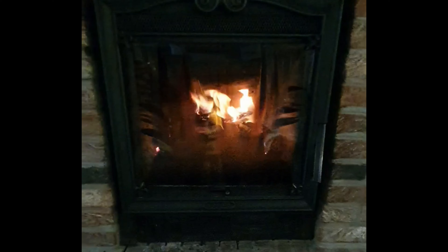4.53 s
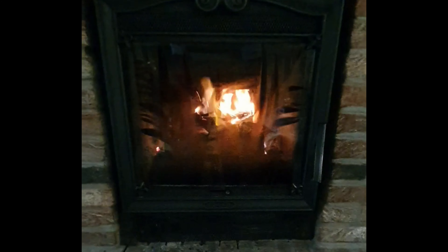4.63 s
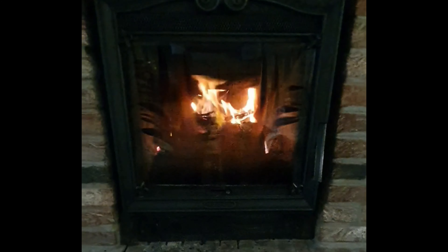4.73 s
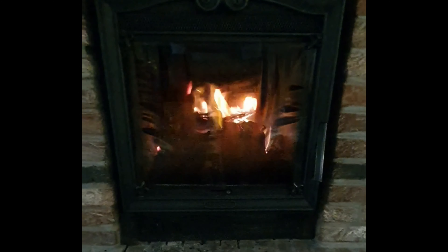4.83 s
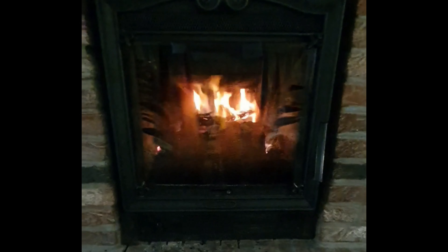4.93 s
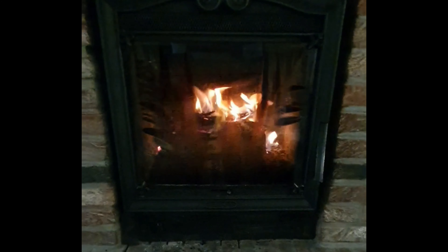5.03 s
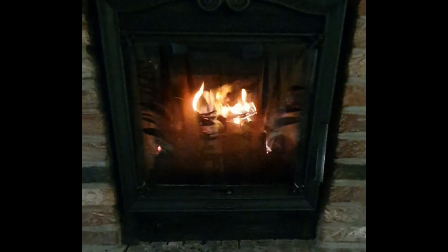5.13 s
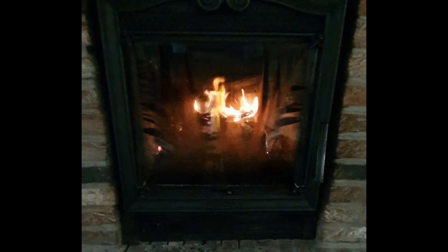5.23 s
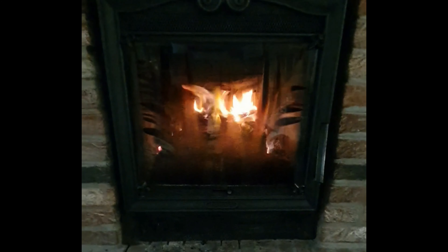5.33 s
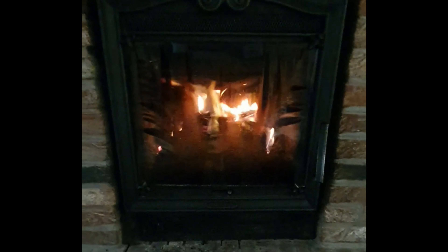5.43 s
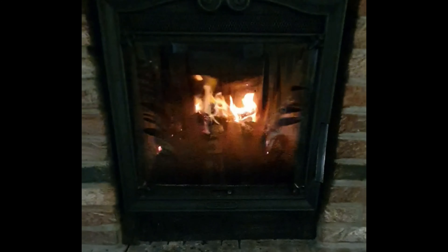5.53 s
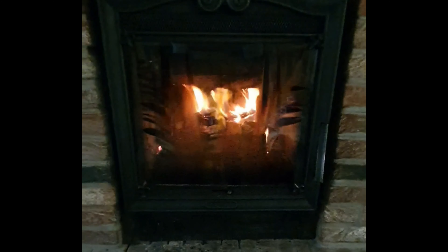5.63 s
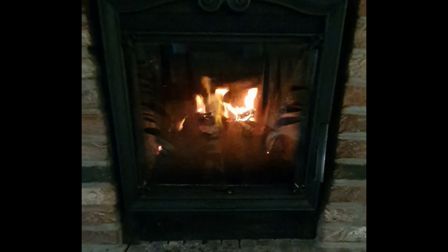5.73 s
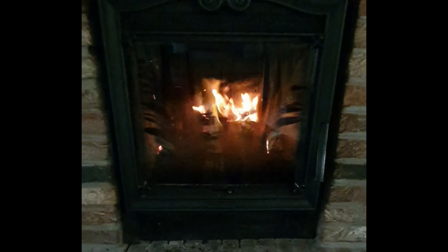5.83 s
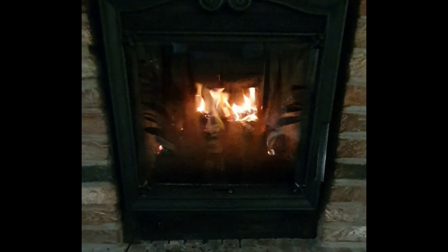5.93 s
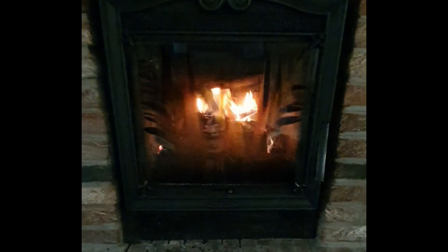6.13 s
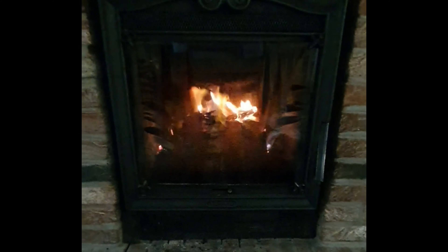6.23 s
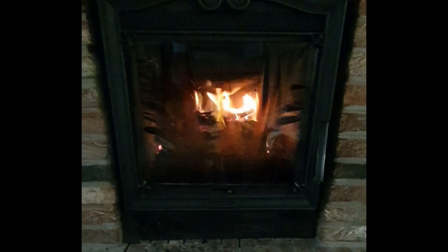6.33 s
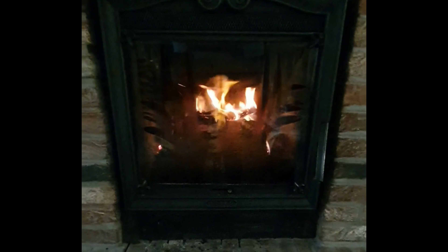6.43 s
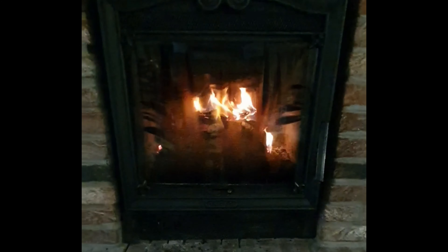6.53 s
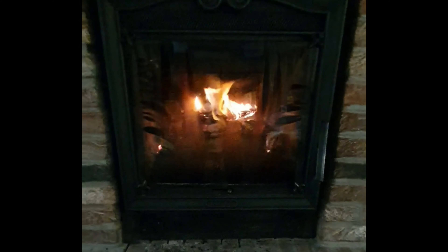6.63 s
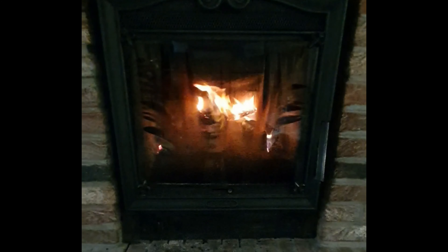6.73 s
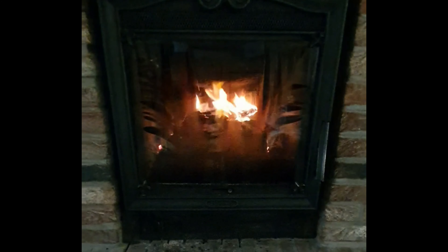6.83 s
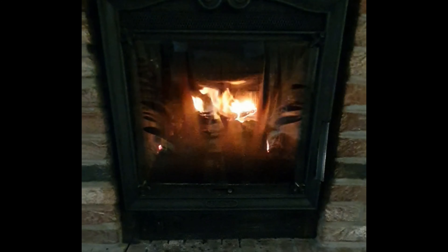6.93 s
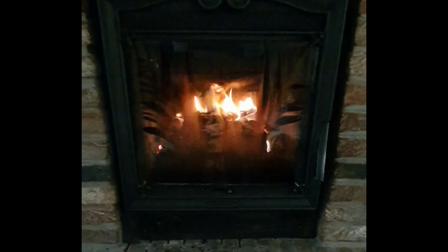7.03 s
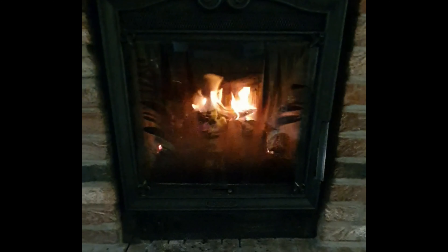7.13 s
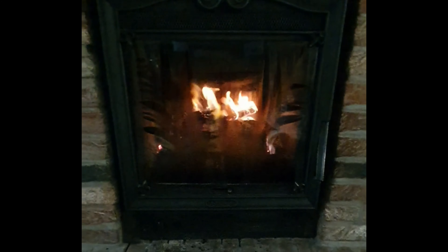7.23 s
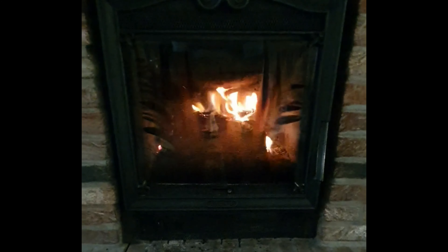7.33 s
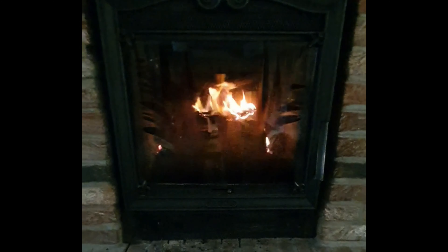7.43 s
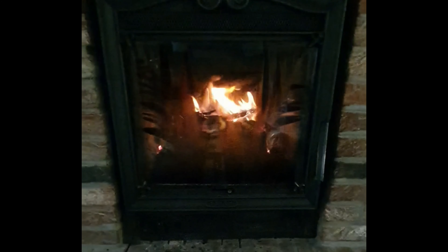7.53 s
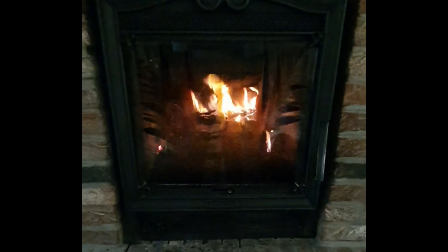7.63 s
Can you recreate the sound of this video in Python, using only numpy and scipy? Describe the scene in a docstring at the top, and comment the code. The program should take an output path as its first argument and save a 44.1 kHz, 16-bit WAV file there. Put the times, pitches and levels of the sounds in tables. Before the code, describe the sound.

Burning logs snap and tick irregularly behind a stove door, one very loud crack early on, later a log settling with dull knocks.

```python
"""Crackling closed fireplace

Logs burn in a closed iron fireplace set in a brick wall, heard from close by.
Pockets of steam burst in the wood: noise cracks that rattle round the firebox and fade in a noise-tail room.
Filtered noise makes the flames rumble and flutter, the embers sizzle, and two soft rushes swell and die away.
Damped sines with a scrape are logs that jolt with the hardest crack and settle after a later one.
The recorder's limiter ducks everything for a moment after the hardest cracks."""
import sys
import numpy as np
from scipy import signal
from scipy.fft import rfft, irfft
from scipy.io import wavfile
from scipy.ndimage import uniform_filter1d, minimum_filter1d

SR = 44100
rng = np.random.default_rng(int(sys.argv[2]) if len(sys.argv) > 2 else 0)


def transcribe(signal):
    """Save signal, clipped to [-1, 1], as a 16-bit WAV file at the path in sys.argv[1]."""
    frames = np.atleast_2d(signal).T
    limited = np.clip(frames, -1, 1)
    pcm = np.round(limited * 32767).astype(np.int16)
    wavfile.write(sys.argv[1], SR, pcm)


N = 338247
TIME = np.arange(N) / SR  # seconds

# Bursts in the wood. Each row: start in seconds, level in dB (rms if its energy filled 9.1 ms),
# pitch of the splinter in Hz, its Q, body of the log in dB against the treble, crack length in ms.
BURSTS = [(0.07, -40.5, 11260, 1.1, -12, 1.5), (0.1178, -30.5, 9400, 1.7, -10, 0.85),
          (0.1277, -20, 10400, 1.6, -15, 0.68), (0.1762, -34.5, 7900, 3.4, -12, 2.6),
          (0.356, -42.5, 5330, 1.1, 0, 2.3), (0.4761, -40, 8100, 5.9, 5, 1.9),
          (0.4886, -39.5, 8400, 4, 10, 1.3), (0.6237, -15.5, 2400, 0.096, -16, 0.77),
          (0.7037, -38, 15000, 0.8, -11, 2), (0.864, -21.5, 7850, 2.9, -10, 3.3),
          (0.988, -41, 5650, 2.1, 8, 2.6), (1.0207, -1.5, 14700, 0.49, 0, 1.53),
          (1.0802, -27.5, 6600, .4, -3, 4.4), (1.2115, -32.5, 11200, 0.85, -6, 1.7),
          (1.3468, -31, 15000, 0.64, 4.5, 0.93), (1.471, -39, 7450, 5, 10.5, 1.4),
          (1.8453, -33, 10830, 1.1, -3, 1.6), (2.0191, -32, 15000, .7, -2, 2.4),
          (2.0939, -36.5, 2530, 0.24, -11.5, 7.2), (2.1501, -30.5, 3970, 2.1, 3, 1.5),
          (2.233, -28.5, 8170, 1.7, -16, 0.23), (2.552, -31, 10300, 2.4, -5, 0.48),
          (2.566, -36.5, 10950, 1.9, 5, 4.3), (2.657, -24, 6760, 1.05, -14, 1.4),
          (2.7948, -28.5, 8700, 0.91, -19, 0.49), (3.0939, -44, 7100, 1.3, 0, 1.4),
          (3.5119, -42, 7800, 2.4, 13.5, 1.3), (3.673, -25, 3370, 0.083, -7.5, 2.8),
          (3.721, -39, 14900, .43, 5, 3.7), (3.9044, -29.5, 15000, 0.6, -2.5, 0.52),
          (3.9402, -28.5, 15300, 0.58, -24, 2), (4.068, -44, 6000, .5, -2, 2.2),
          (4.2523, -42, 9000, .7, -7, 2.1), (4.2903, -34, 12100, 7.6, 0, .4),
          (4.6419, -45.5, 13000, 0.93, 3, 2), (4.7841, -35.5, 15100, 1.2, 5, 0.58),
          (4.9092, -33, 15000, 2.8, 6, 2.5), (5.0362, -34, 8000, 0.32, -9, 3.4),
          (5.3458, -33.5, 3800, 0.2, -12, 2.2), (5.7126, -21, 496, 1.15, -7.5, 3),
          (5.7309, -20.5, 3450, 0.15, -18, 0.36), (5.735, -16.5, 5740, 0.53, -12, 1.6),
          (5.8056, -36.5, 6550, 1.7, -4, 0.2), (5.867, -26, 3790, 0.027, -6, 1.9),
          (6.105, -40, 10400, 0.24, -7, 2.9), (6.2596, -35.5, 4900, 0.97, -9, 1.3),
          (6.3195, -35.5, 460, 0.15, -12.5, 2.4), (6.3724, -38.5, 7770, .19, -20, 0.92),
          (6.4507, -13, 650, 0.43, -10.5, 1.8), (6.5015, -32, 3320, 4.8, 0, .9),
          (6.5064, -28, 3470, 3.3, -4, 5.5), (6.637, -38.5, 2970, 0.33, 1, 1.4),
          (7.1374, -27, 7250, 0.46, -7, 0.33), (7.2536, -33.5, 7700, 4.2, -6, 0.52),
          (7.2669, -38, 5760, .27, -21, 2.4), (7.479, -42.5, 13500, 2.4, -9, 1.6),
          (7.564, -32.5, 12830, 0.52, -25, 3.7), (7.6198, -36, 9450, .7, -11, 1.7),
          (7.639, -28, 15000, 0.2, -18, 2.2)]
# Colour the firebox gives every burst. Each row: frequency in Hz, relative level in dB.
FIREBOX_COLOUR = [(180, 2), (300, 9), (760, 5), (1000, 3.5), (1250, 5.5), (1550, 3.5), (2000, 0.5),
                  (2450, 0), (3300, 1), (4500, -1), (10000, -0.5), (13000, 1), (15500, 3.5)]
# Logs jolt and settle. Each row: start in seconds, peak of the tone in dB, pitch in Hz,
# time to the peak in ms.
LOG_KNOCKS = [(1.0193, -20.5, 100, 1.54), (1.0205, -9.5, 1100, 0.72), (6.655, -18, 333, 4.8),
              (6.658, -26, 88, 6), (6.667, -33.5, 576, 6.8), (6.701, -29, 74, 12.3), (6.73, -36, 284, 6),
              (6.904, -33.5, 374, 1.8), (6.922, -33, 357, 1.4)]
# Soft rushes of diffuse noise. Each row: start in seconds, rms at the peak in dB, rise in seconds,
# decay in seconds, upper edge in Hz.
RUSHES = [(3.151, -43, 0.039, 0.13, 14100), (6.495, -34, 0.035, 0.12, 3930)]
# Spectrum of the rushes on top of their upper edge. Each row: frequency in Hz, relative level in dB.
RUSH_COLOUR = [(300, -13), (950, -1.5), (2500, 1.5), (3800, -3.5), (6000, -8.5), (10000, -14.5),
               (15000, -34)]
# Air in the firebox and flue, deep and upper. Each row: frequency in Hz, width in Hz, relative level in dB.
DEEP_MODES = [(47.4, 11, -12.5), (70, 5.4, -1), (87.4, 9.4, -4.5), (112, 21, -8), (152, 19, -13)]
UPPER_MODES = [(170, 13, -2), (251.2, 4.4, 6.5), (280, 180, -3), (353, 50, -6), (559, 19, -6),
               (660, 250, -14.5)]
# The flames flare up. Each row: moment of the height in seconds, rise in dB, length in seconds.
FLARES = [(0.817, 2.5, 0.19), (1.502, 8, 0.024), (1.642, 4.5, 0.16), (2.17, 7, 0.053), (2.577, 3, .1),
          (2.772, 8, 0.036), (2.953, 3.5, 0.089), (3.143, 4.5, 0.08), (3.98, 10.5, 0.074), (4.517, 11, 0.1),
          (4.9, 5.5, 0.068), (5.22, 3.5, 0.26), (7.126, 4.5, 0.079), (7.6, 7, 0.042)]
# Spectrum of the ember hiss. Each row: frequency in Hz, relative level in dB.
SIZZLE_COLOUR = [(400, -6), (800, 0), (1200, -.5), (2000, -1.5), (2800, .5), (5500, -.5), (7500, 1),
                 (10500, -1), (12700, 2.5), (15500, -.5)]
# Spectrum of the room tail. Each row: frequency in Hz, gain in dB.
ROOM_COLOUR = [(100, 10), (400, -19.5), (1200, -10), (3300, -12.5), (6000, -17), (10000, -21), (15000, -31)]
# Reverberation. Each row: frequency in Hz, time to fall 60 dB in seconds.
ROOM_DECAY = [(300, 0.61), (1500, 0.79), (3500, 0.63), (7000, 0.48), (14000, 0.38)]

TOP_HZ = 15600  # nothing sounds above this
POP_SIZE, LEAD_SIZE = 4096, 256  # samples in a burst, and those ahead of its crack
# A medium burst rattles and feeds the room this much; fainter ones get relatively more
# rattle and room (slopes in dB per dB).
MEDIUM_DB = -30
RATTLE_DB, RATTLE_SLOPE = -4.5, 0.14
ROOM_SEND_DB, ROOM_SLOPE = 2.5, 0.22
RUMBLE_DB, FLUTTER_DB, SIZZLE_DB = -51.5, -53.5, -53  # levels of the calm fire
RUMBLE_HALF_S = 0.025  # a flare this long lifts the rumble half as many dB as the flutter


def undb(db):
    """Decibels to gain."""
    return 10 ** (np.asarray(db) / 20)


def unit(x):
    """Scale to rms 1."""
    return x / np.sqrt(np.mean(x ** 2))


def seconds(ms):
    """Milliseconds to seconds."""
    return ms / 1000


def add(out, s, x):
    """Mix x into out from time s on."""
    start = int(round(s * SR))
    a, b = max(start, 0), min(start + len(x), len(out))
    if b > a:
        out[a:b] += x[a - start:b - start]


def bins(x):
    """Frequencies of the spectrum of x, at least 1 Hz."""
    return np.maximum(np.fft.rfftfreq(len(x), 1 / SR), 1)


def read(points, hz):
    """Read (Hz, value) points on a log-frequency axis."""
    f, value = np.transpose(points)
    return np.interp(np.log(hz), np.log(f), value)


def colour(x, points):
    """Filter x with a curve of (Hz, dB) points."""
    return irfft(rfft(x) * undb(read(points, bins(x))), len(x))


def resonance(f, hz, q):
    """Response of one resonance, gain 1 at its centre."""
    return 1 / (1 + 1j * q * (f / hz - hz / f))


def highpass(f, hz, order):
    """Response of a smooth high-pass."""
    b, a = signal.butter(order, 1, "high", analog=True)
    return signal.freqs(b, a, f / hz)[1]


def walk(rate):
    """Random levels held for 1 / rate seconds and smoothed twice; rms 1."""
    k = int(SR / rate)
    held = np.repeat(rng.standard_normal(N // k + 1), k)[:N]
    return unit(uniform_filter1d(uniform_filter1d(held, k), k))


def pop(crack_ms, rattle_db, rattle_ms=4.5, tear_db=-14, tear_ms=0.5, snap=5.0):
    """Fibres tear, the pocket bursts, and the crack rattles between the firebox walls."""
    t = (np.arange(POP_SIZE) - LEAD_SIZE) / SR
    grit = rng.standard_normal((3, POP_SIZE))
    tear = grit[0] * (t < 0) * np.exp(-np.abs(t) / seconds(tear_ms))
    crack = grit[1] * (t >= 0) * np.exp(-(t / seconds(crack_ms)) ** 2)
    crack[LEAD_SIZE] += snap  # the first pressure spike
    late = t - seconds(crack_ms)
    rattle = grit[2] * (late >= 0) * np.exp(-np.abs(late) / seconds(rattle_ms))
    return undb(tear_db) * unit(tear) + unit(crack) + undb(rattle_db) * unit(rattle)


def splinters(push, count=10, ring_db=2, ring_q=55, low_hz=2300, high_hz=13000):
    """A burst sets splinters of chance sizes ringing for a few milliseconds."""
    f = bins(push)
    pitches = low_hz * (high_hz / low_hz) ** rng.random(count)
    rings = sum(resonance(f, hz, ring_q) for hz in pitches)
    return irfft(rfft(push) * (1 + undb(ring_db) * rings))


def radiate(push, hz, q, body_db, splinter_hz=2600, log_hz=200):
    """A small splinter radiates only treble, the lows come from the log, the firebox colours both."""
    f = bins(push)
    treble_share = np.abs(highpass(f, splinter_hz, order=3)) ** 2
    body_share = undb(body_db) ** 2 * np.abs(1 - treble_share)
    radiation = np.sqrt(treble_share + body_share) * highpass(f, log_hz, order=2)
    sound = irfft(rfft(push) * resonance(f, hz, q) * radiation * (f < TOP_HZ))
    energy_gain = np.sqrt(seconds(9.1) * SR / POP_SIZE)  # the energy of 9.1 ms at rms 1
    return unit(colour(sound, FIREBOX_COLOUR)) * energy_gain


def snaps():
    """Steam bursts the wood: the direct cracks, and what each sends into the room."""
    direct, send = np.zeros(N), np.zeros(N)
    # the room gathers sound from all directions, which evens out the fine colour of a burst
    even_push = signal.unit_impulse(POP_SIZE, LEAD_SIZE)
    for s, db, hz, q, body_db, crack_ms in BURSTS:
        start = s - LEAD_SIZE / SR
        below_medium_db = MEDIUM_DB - db
        push = splinters(pop(crack_ms, RATTLE_DB + RATTLE_SLOPE * below_medium_db))
        add(direct, start, undb(db) * radiate(push, hz, q, body_db))
        send_db = db + ROOM_SEND_DB + ROOM_SLOPE * below_medium_db
        add(send, start, undb(send_db) * radiate(even_push, hz, q, body_db))
    return direct, send


def ticks(count=210, faint_db=-54.5, range_db=12, low_hz=3500, high_hz=14500, body_db=-6):
    """Many tiny bursts at random moments, more of them faint than strong."""
    out = np.zeros(N)
    for when, size, pitch, sharp in rng.random((count, 4)):
        push = pop(crack_ms=1.2, rattle_db=-3.0)
        hz = low_hz + pitch * (high_hz - low_hz)
        sound = radiate(push, hz, q=0.4 + 2 * sharp, body_db=body_db)
        add(out, when * N / SR, sound * undb(faint_db + range_db * size ** 2))
    return out


def thuds(scrape_db=-9, scrape_q=1.35):
    """Damped knocks of a log on the embers: a sine that swells and dies, with a dull noise scrape."""
    out, t = np.zeros(N), TIME[:SR // 4]
    for s, db, hz, peak_ms in LOG_KNOCKS:
        age = t / seconds(peak_ms)
        swell = age ** 2 * np.exp(2 * (1 - age))  # height 1 at age 1
        noise = rfft(rng.standard_normal(len(t)))
        scrape = irfft(noise * resonance(bins(t), hz, scrape_q) ** 2, len(t))
        knock = np.sin(2 * np.pi * hz * t) + undb(scrape_db) * unit(scrape)
        add(out, s, undb(db) * swell * knock)
    return out


def rushes(grain_db=1.5, edge_q=2.25):
    """Soft rushes of diffuse, grainy noise that swell and die away."""
    out, t = np.zeros(N), TIME[:SR]
    for s, db, rise, decay, edge_hz in RUSHES:
        swell = np.minimum(t / rise, 1) * np.exp(-np.maximum(t - rise, 0) / decay)
        noise = rng.standard_normal(SR) * undb(grain_db * walk(300)[:SR])
        # a resonant low-pass at the upper edge
        edge = resonance(bins(t), edge_hz, edge_q) / bins(t)
        noise = irfft(rfft(noise) * edge, SR)
        add(out, s, undb(db) * swell * unit(colour(noise, RUSH_COLOUR)))
    return out


def roar(modes, low_hz, top_hz, flicker_db, flicker_rate):
    """Turbulent burning shakes the air modes of the firebox; rms 1."""
    f = bins(TIME)
    powers = [np.abs(undb(db) * resonance(f, hz, hz / width)) ** 2 for hz, width, db in modes]
    box = np.sqrt(sum(powers))
    band = np.abs(highpass(f, low_hz, order=2)) / np.sqrt(1 + (f / top_hz) ** 4)
    turbulence = rng.standard_normal(N) * undb(flicker_db * walk(flicker_rate))
    return unit(irfft(rfft(turbulence) * box * band, N))


def flames(rumble_flicker_db=2.0, flutter_flicker_db=3.5, lumps_db=1.04):
    """The draught rumbles; each flare sets the flames flapping, and a long one lifts the rumble too."""
    rumble_db, flutter_db = np.zeros(N), np.zeros(N)
    for s, rise_db, length in FLARES:
        flare_db = rise_db * np.exp(-2 * ((TIME - s) / length) ** 2)
        flutter_db += flare_db
        rumble_db += flare_db * length / (length + RUMBLE_HALF_S)
    rumble = roar(DEEP_MODES, low_hz=42.7, top_hz=183, flicker_db=rumble_flicker_db, flicker_rate=6.7)
    flutter = roar(UPPER_MODES, low_hz=180, top_hz=660, flicker_db=flutter_flicker_db, flicker_rate=100)
    flutter_db += lumps_db * walk(25)
    return rumble * undb(RUMBLE_DB + rumble_db) + flutter * undb(FLUTTER_DB + flutter_db)


def sizzle(grain_db=1.5, drift_db=-0.5):
    """Sap boils off the embers as a fine, grainy hiss."""
    grain_level_db = grain_db * walk(700) + drift_db * walk(56)
    grains = rng.standard_normal(N) * undb(grain_level_db)
    return undb(SIZZLE_DB) * unit(colour(grains, SIZZLE_COLOUR))


def room(x, far_wall_s=0.052, early_db=-3, bloom_s=0.19, bloom_db=4):
    """A diffuse tail that steps up when the far wall answers and fills out further; its treble dies first."""
    t = TIME[:SR]
    noise = rfft(rng.standard_normal(SR))
    octave = np.clip(np.round(np.log2(bins(t))), 7, 14)
    build = undb(early_db * (t < far_wall_s) + bloom_db * np.minimum(t / bloom_s, 1))
    tail = np.zeros(SR)
    for k in np.unique(octave):
        fade = build * np.exp(-np.log(1000) * t / read(ROOM_DECAY, 2 ** k))
        tail += irfft(noise * (octave == k), SR) * fade / np.sqrt(np.sum(fade ** 2))
    padded = np.r_[tail, np.zeros(SR)]  # keeps the filter from wrapping round
    tail = colour(padded, ROOM_COLOUR)[:SR]
    return signal.fftconvolve(x, tail)[:N]


def limiter(x, top_db=-4.5, sense_ms=1.02, hold_s=0.072, release_s=0.14):
    """The hardest cracks turn the gain down; it holds, then creeps back, so fire and room duck for a moment."""
    sense, hold, release = (max(int(s * SR), 2) for s in (seconds(sense_ms), hold_s, release_s))
    power = uniform_filter1d(x ** 2, sense)
    over_db = 10 * np.log10(np.maximum(power / undb(top_db) ** 2, 1))
    # the hold looks one sensing window ahead
    held_db = -minimum_filter1d(-over_db, hold, origin=hold // 2 - sense, mode="constant")
    easing_db = uniform_filter1d(held_db, release, origin=(release - 1) // 2, mode="constant")
    return x * undb(-np.maximum(held_db, easing_db))


def scene():
    """The fire and its room, in one channel."""
    direct, send = snaps()
    fire = direct + room(send) + ticks() + sizzle() + flames() + thuds() + rushes()
    return fire[None]


def record(dry):
    """The recorder limits the hardest cracks, clips what peaks get through and cuts the top."""
    top = signal.firwin(255, TOP_HZ, window=("kaiser", 9), fs=SR)
    clipped = np.clip(limiter(dry), -1, 1)
    return signal.fftconvolve(clipped, top[None], mode="same")


dry = scene()
out = record(dry)
transcribe(out)
```